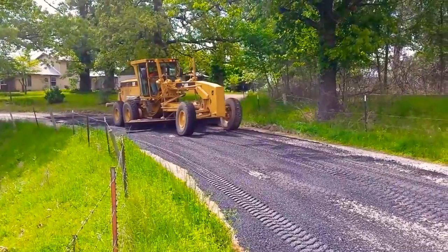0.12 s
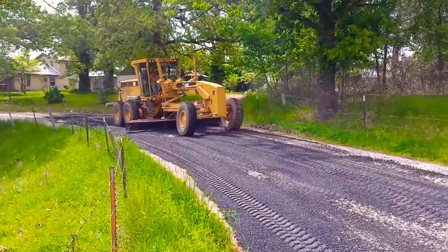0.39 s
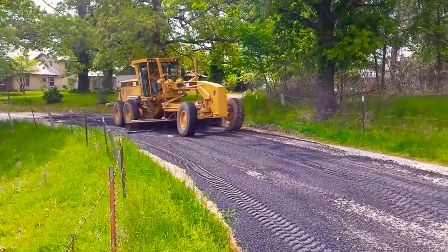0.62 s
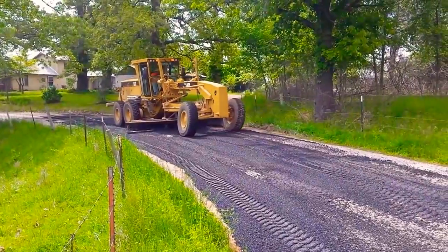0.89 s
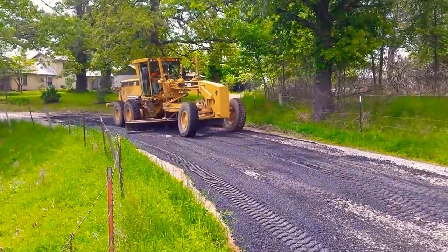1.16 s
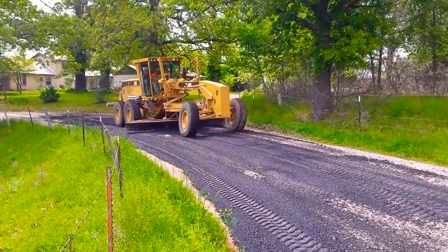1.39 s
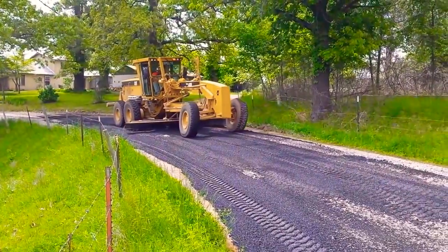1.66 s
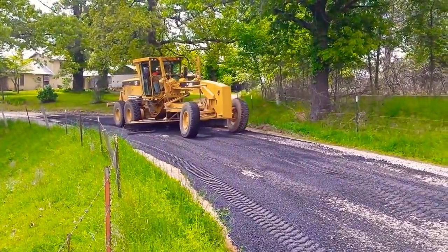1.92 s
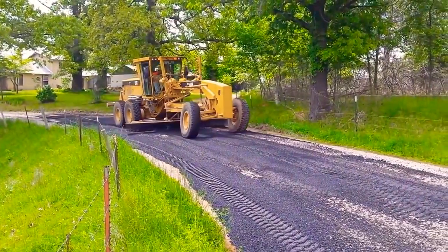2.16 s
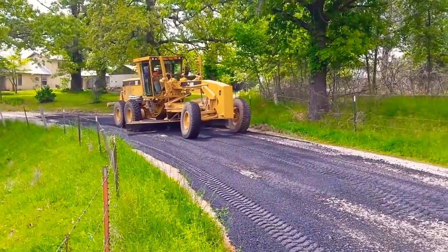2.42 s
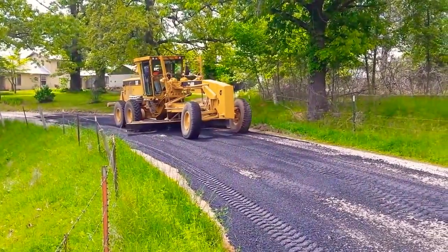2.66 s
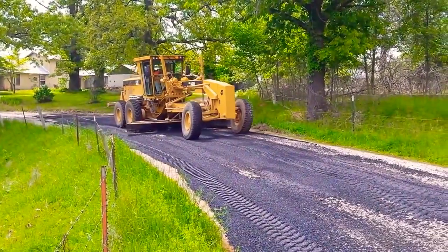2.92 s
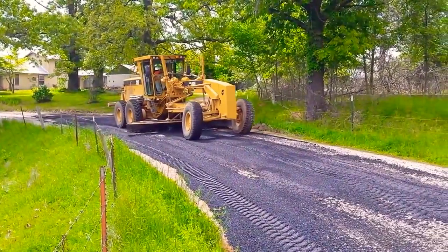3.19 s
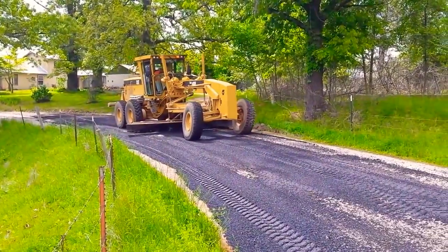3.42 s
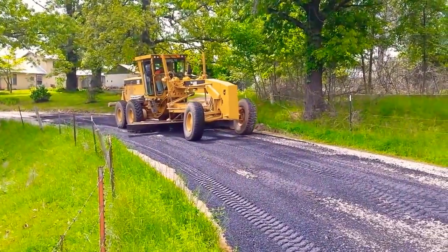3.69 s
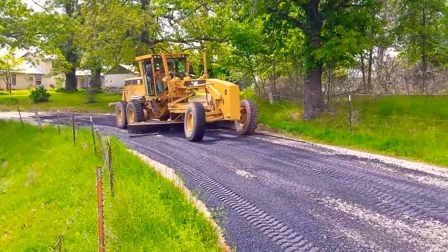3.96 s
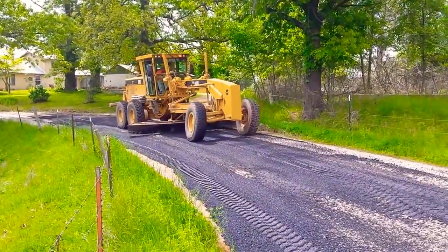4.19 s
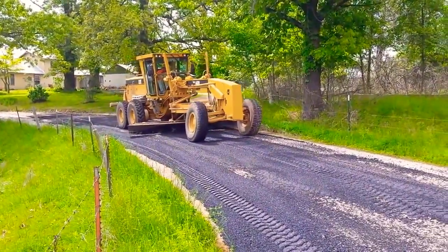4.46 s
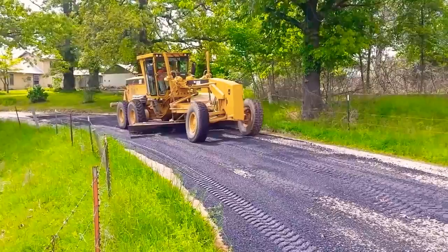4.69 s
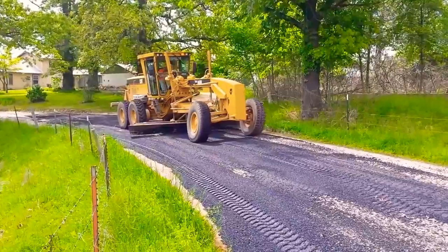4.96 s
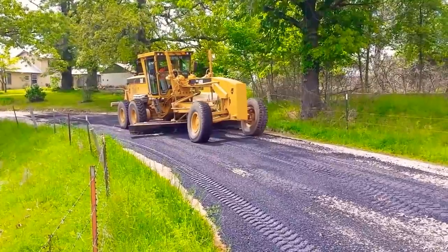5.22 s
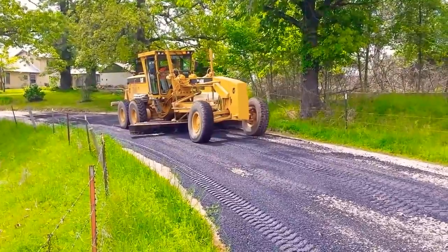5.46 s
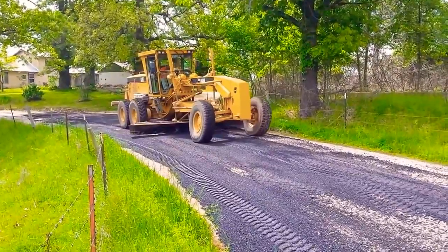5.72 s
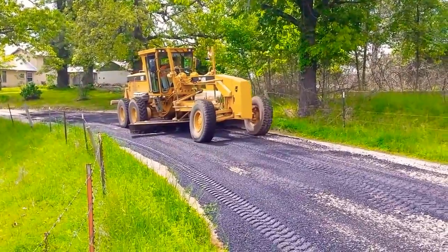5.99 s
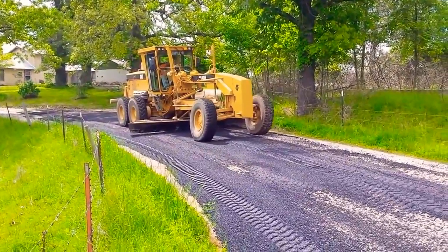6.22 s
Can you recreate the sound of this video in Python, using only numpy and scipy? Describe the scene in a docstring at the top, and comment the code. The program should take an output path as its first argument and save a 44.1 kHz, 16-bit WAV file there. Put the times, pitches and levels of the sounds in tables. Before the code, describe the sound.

Outdoors on a rural road, a heavy diesel grader runs at nearly constant speed, a low hum with rattling clatter, mechanical whine and airy hiss. Wind thumps the unprotected stereo microphone irregularly on each side, roughest from one and a half to three and a half seconds, with sharp slaps mostly on the right. A small bird gives quick falling whistles and then a fast trill before the engine is left clearer.

```python
"""Country road: a road grader at work, its six-cylinder diesel at a nearly steady speed.
Engine: exhaust and gear tones locked to the firings, noise pulsed by them, whines, hiss, grit, brief swells.
Gusts of shaped noise and sharp slaps buffet the two microphone ports, each on its own, and push the limiter.
A small bird sings falling sine sweeps, then a trill, with echoes from the trees; one thin tick near the end."""
import sys
import numpy as np
from scipy import signal
from scipy.fft import rfft, irfft, next_fast_len
from scipy.io import wavfile
from scipy.ndimage import uniform_filter1d, map_coordinates

SR = 44100
rng = np.random.default_rng(int(sys.argv[2]) if len(sys.argv) > 2 else 0)


def attenuation_scalar(level_db):
    """Turn a level in dB into a linear amplitude multiplier (20 dB per decade)."""
    decades = np.asarray(level_db, float) / 20
    return 10 ** decades


def output_pcm(signal):
    """Save a mono or channel-first signal as 16-bit PCM at the path in sys.argv[1].

    Samples are clipped to [-1, 1] before scaling.
    """
    pcm = np.clip(np.atleast_2d(signal).T, -1, 1) * 32767
    wavfile.write(sys.argv[1], SR, np.round(pcm).astype(np.int16))


N = 280416

FIRING_HZ = 86.47
# relative strength of the six firings of an engine cycle: level_db
CYLINDER_DB = [4.5, -16, 1.5, -20, 0.5, -11]


def in_time(rows):
    """Columns of a breakpoint curve, one value per sample."""
    s, *columns = np.transpose(rows)
    return [np.interp(np.arange(N) / SR, s, column) for column in columns]


def at_hz(points, hz):
    """A spectrum read on a log-frequency axis."""
    points_hz, values = np.transpose(points)
    return np.interp(np.log(hz), np.log(points_hz), values)


def rms_one(x):
    """Scales to rms 1."""
    return x / np.sqrt(np.mean(x ** 2) + 1e-20)


def filtered(x, response):
    """Applies a response given as a function of Hz."""
    size = next_fast_len(N)
    hz = np.maximum(np.arange(size // 2 + 1) * SR / size, 1)
    return irfft(rfft(x, size) * response(hz), size)[..., :N]


def coloured(x, spectrum):
    """Shapes a signal by a spectrum; rms 1."""
    return rms_one(filtered(x, lambda hz: attenuation_scalar(at_hz(spectrum, hz))))


def drift(rate_hz):
    """Slow random curve of rms 1."""
    return rms_one(filtered(rng.standard_normal(N), lambda hz: (hz > 1) / (1 + (hz / rate_hz) ** 2)))


def evened(x, span_s, share):
    """Takes a share of the slow chance swells out of a noise; rms 1."""
    span = round(span_s * SR)
    power = uniform_filter1d(uniform_filter1d(x ** 2, span), span)
    return rms_one(x / (power + 1e-9) ** (share / 2))


def resonances(modes):
    """Response of narrow resonances, each applied twice for steep skirts; level_db is for unit noise."""
    return lambda hz: np.sqrt(SR / np.pi) * sum(
        attenuation_scalar(db) / np.sqrt(width) / (1 + 1j * (hz - centre_hz) / width) ** 2 for centre_hz, width, db in modes)


def firing_phase(waver):
    """Firings counted since the start; the governor lets the speed waver a little."""
    return np.cumsum(FIRING_HZ * (1 + waver * drift(3.4))) / SR


def firing_gate(phase, depth, decay):
    """Each firing lifts the gain, which decays until the next; decay in firing intervals."""
    strength = attenuation_scalar(CYLINDER_DB)[phase.astype(int) % len(CYLINDER_DB)]
    return 1 + depth * strength * np.exp(-(phase % 1) / decay)


def exhaust(phase):
    """Low orders of the exhaust beat: sines locked to the firings, each level drifting."""
    # exhaust tones: multiple of the firing rate, level_db (rms before drift)
    orders = [(.5, -43), (2 / 3, -41), (0.98, -38.5), (4 / 3, -49.5), (3 / 2, -46.5), (5 / 3, -49.5),
              (2.0, -50.5)]
    tones = 0
    for order, db in orders:
        level = np.sqrt(2) * attenuation_scalar(db + 2.2 * drift(12.0))
        tones = tones + level * np.sin(2 * np.pi * order * phase)
    return tones


def gears(phase):
    """Gear and pump sines that follow engine speed; each level and phase drifts on its own."""
    # gear and pump tones: pitch_hz, level_db (rms before drift)
    gear_tones = [(405, -48.5), (556, -57), (610, -54), (714, -50), (838, -53.5), (920, -51), (1066, -55),
                  (2130, -56.5)]
    tones = 0
    for hz, db in gear_tones:
        level = np.sqrt(2) * attenuation_scalar(db + 3.87 * drift(7.4))
        turns = hz / FIRING_HZ * phase + .25 * drift(3.95)
        tones = tones + level * np.sin(2 * np.pi * turns)
    return tones


def repeating(phase, fresh):
    """Part of the clatter is the same contact pattern every cycle, which draws faint harmonics."""
    size, cycle_power_share = 3072, 0.36
    place = (phase / len(CYLINDER_DB) % 1 * size).astype(int)
    pattern = rng.standard_normal(size)[place]
    return np.sqrt(cycle_power_share) * pattern + np.sqrt(1 - cycle_power_share) * fresh


def ground(hz):
    """The road returns a late, phase-turned copy that cuts notches; rough ground scatters the treble."""
    lag_s, phase_rad, low_share, cut_hz = 0.001326, -0.86, 0.54, 2160
    share = low_share / (1 + (hz / cut_hz) ** 2)
    return 1 + share * np.exp(-1j * (2 * np.pi * hz * lag_s + phase_rad))


def knocks():
    """Valve and injector rattle: dense small clicks of uneven size and random sign."""
    # rattle spectrum: freq_hz, level_db (per Hz, relative)
    knock_spectrum = [(900, -27), (1400, 1.5), (1800, 1.5), (2400, -2.5), (3200, -1.5), (4000, -13),
                      (6000, -39.5)]
    knocks_per_s = 900
    sizes = attenuation_scalar(3.4 * np.minimum(rng.exponential(1, N), 4)) * rng.choice([-1, 1], N)
    return coloured(sizes * (rng.random(N) < knocks_per_s / SR), knock_spectrum)


def whines(white):
    """Noise through narrow resonances, swelling slowly together; a warped time axis wavers the pitch."""
    # whines of pump, gears and panels: freq_hz, width_hz, level_db (relative)
    whine_modes = [(630, 31, -18), (700, 26, -10), (860, 58, -17), (917, 20, -15), (1540, 46, -11),
                   (1824, 14, -26), (2134, 66, -15.5), (2222, 9.6, -17), (2363, 33, -17), (2728, 21, -17),
                   (3020, 30, -22.5), (3705, 41, -22.5)]
    pitch_waver = .007  # rms share
    steady = filtered(white * attenuation_scalar(1.5 * drift(1.9)), resonances(whine_modes))
    reading = np.cumsum(1 + pitch_waver * drift(4.0))
    return map_coordinates(steady, [reading], order=3, mode="reflect")


def grader_noise(phase, load):
    """One draw of clatter, whines, hiss and grit, all swelling with the load on the blade."""
    # levels of engine, hiss and grit, before trims and drifts: time_s, engine_db, hiss_db, grit_db
    grader_levels = [(0, -39, -48.5, -87), (.7, -40, -47.5, -73), (1.3, -38.5, -46, -77),
                     (1.76, -39.5, -47, -81), (2.3, -37, -44.5, -85), (2.5, -38.5, -47, -87),
                     (2.85, -38, -46, -83), (3.2, -40, -48, -91), (3.6, -40, -46, -74.5),
                     (4.1, -37.5, -46.5, -82), (4.7, -37.5, -45.5, -71), (5.2, -38, -47, -75.5),
                     (5.9, -37, -45, -71.5), (6.36, -37.5, -45, -69)]
    # combustion clatter through block and hood: freq_hz, level_db (per Hz, relative)
    clatter_spectrum = [(150, -5.5), (300, -1.5), (480, -1.5), (700, 1), (1000, -1.5), (1250, 0.5),
                        (1550, -5), (2000, -3), (2400, -12.5), (2800, -7.5), (3150, -8), (3350, -13),
                        (3600, -12), (4200, -21), (7000, -79)]
    # fan and intake hiss: freq_hz, level_db (per Hz, relative)
    hiss_spectrum = [(1500, -48), (2500, -5), (3500, -16.5), (4300, -1.5), (5200, 0.5), (6500, 2),
                     (7500, -0.5), (8500, -8.5), (9400, -18), (9750, -25), (10000, -45), (10800, -75)]
    # asphalt grit under the blade: freq_hz, level_db (per Hz, relative)
    grit_spectrum = [(8000, -54), (10500, 5), (12000, 11), (14000, 1), (15000, -30)]
    engine_db, hiss_db, grit_db = in_time(grader_levels)
    white = rng.standard_normal((4, N))
    pulsed = repeating(phase, white[0]) * firing_gate(phase, depth=0.34, decay=0.71)
    clatter = coloured(filtered(pulsed, ground), clatter_spectrum)
    clatter = clatter + attenuation_scalar(-10 + 1.1 * load) * knocks()
    tones = whines(white[1])
    hiss = coloured(white[2] * firing_gate(phase, depth=0.29, decay=0.28), hiss_spectrum)
    grit = coloured(white[3], grit_spectrum)
    engine_gain = attenuation_scalar(engine_db + 0.21 * load + 1.27 * drift(40))
    hiss_gain = attenuation_scalar(hiss_db + .5 * load + .5 * drift(23) + 5.0)
    grit_gain = attenuation_scalar(grit_db + 1.8 * load + 1.8 * drift(4.0))
    return engine_gain * (attenuation_scalar(4.5) * clatter + attenuation_scalar(4.0) * tones) + hiss_gain * hiss + grit_gain * grit


def grader():
    """Direct noise differs in phase and level between ports; scattered noise is drawn for each port."""
    # left-right likeness: freq_hz, shared share of power
    likeness = [(300, 0.94), (800, 0.96), (1200, 0.65), (1550, 0.93), (1950, 0.68), (2500, 0.8),
                (3100, 0.61), (3900, 0.45), (5000, 0.49), (7000, 0.35), (12000, 0.08)]
    # left over right: freq_hz, level_db
    left_over_right = [(300, 1.5), (500, -1), (800, 1), (1200, -2.5), (1800, -6), (2700, -0.5), (4000, 4.5),
                       (6200, 4), (8000, -4), (9400, -16), (11000, -34.5), (14000, -31.5)]
    # phase lead of the left port: freq_hz, lead_rad
    left_leads = [(300, 0.16), (1100, -0.6), (1550, -1.5), (2000, 1), (2500, 0.4), (3100, -2.1),
                  (3900, -1.42), (6600, -4), (8900, -4.1)]
    phase, load = firing_phase(waver=.005), drift(10)
    direct, *scattered = [grader_noise(phase, load) for path in ("direct", "left", "right")]

    def alike(hz):
        return np.clip(at_hz(likeness, hz), 0, 1)

    def port(side, own):
        def shade(hz):
            return attenuation_scalar(side * at_hz(left_over_right, hz) / 2)

        def direct_path(hz):
            return shade(hz) * np.sqrt(alike(hz)) * np.exp(.5j * side * at_hz(left_leads, hz))

        def scattered_path(hz):
            return shade(hz) * np.sqrt(1 - alike(hz))

        return filtered(direct, direct_path) + filtered(own, scattered_path)

    ports = [port(side, own) for side, own in zip((1, -1), scattered)]
    return np.array(ports) + exhaust(phase) + gears(phase)


def noise_swells():
    """Brief swells of narrow-band noise near 1.6, 1.8 and 2.8 kHz."""
    # swells: centre_s, length_s, level_db (before the bands)
    swell_events = [(3.022, 0.033, -32), (4.044, 0.04, -37), (4.46, 0.029, -31), (4.744, 0.052, -31),
                    (4.854, 0.048, -29.5), (4.935, 0.037, -32), (5.425, 0.043, -31), (5.812, 0.044, -38),
                    (5.91, 0.055, -37)]
    # bands: freq_hz, width_hz, level_db
    swell_bands = [(1567, 32, -4), (1820, 58, -13), (2780, 200, -17)]
    t = np.arange(N) / SR
    bells = sum(attenuation_scalar(db) * np.exp(-((t - s) / (length / 2)) ** 2) for s, length, db in swell_events)
    swells = filtered(rng.standard_normal(N) * bells, resonances(swell_bands))
    return swells * attenuation_scalar([[-2], [2]])


def puffs(port):
    """Single buffets: each a short bell of buffeting and flutter power at one port."""
    # buffets: centre_s, port (1 left, -1 right), length_s, buffet_db, flutter_db
    single_buffets = [(0.019, 1, 0.027, -16.5, -39), (0.095, -1, 0.011, -13, -23),
                      (0.17, -1, 0.027, -13, -23), (0.237, -1, 0.012, -17, -26),
                      (0.276, -1, 0.034, -19.5, -41), (0.312, -1, 0.011, -21, -32),
                      (0.397, -1, 0.013, -32, -27), (0.588, -1, 0.013, -31, -25),
                      (0.622, 1, 0.019, -9.5, -23.5), (0.683, -1, 0.052, -22, -21),
                      (0.73, -1, 0.01, -8, -27), (0.77, -1, 0.044, -20, -45),
                      (0.836, -1, 0.027, -25, -27.5), (0.932, -1, 0.056, -19.5, -42),
                      (0.758, 1, 0.06, -18, -39), (0.846, 1, 0.031, -14.5, -27),
                      (0.908, 1, 0.038, -14.5, -39), (1.043, 1, 0.032, -10, -38), (1.08, 1, 0.024, -9, -29),
                      (1.14, 1, 0.042, -17.5, -26.5), (1.117, -1, 0.064, -17, -35),
                      (1.167, -1, 0.013, -15, -24), (1.203, -1, 0.04, -22, -31),
                      (1.239, -1, 0.017, -12, -19.5), (1.444, -1, 0.062, -19, -29.5),
                      (1.474, 1, 0.06, -8.5, -38), (1.526, -1, 0.053, -14, -21.5),
                      (1.569, -1, 0.02, -17, -25), (1.58, 1, 0.056, -7.5, -29.5),
                      (1.622, -1, 0.049, -20, -17), (1.653, -1, 0.033, -16, -30),
                      (1.69, 1, 0.047, -11, -21.5), (1.737, 1, 0.015, -13, -16.5),
                      (1.767, -1, 0.04, -16, -30), (1.844, 1, 0.06, -8, -32), (1.885, -1, 0.034, -8.5, -21),
                      (1.929, -1, 0.02, -17, -24), (1.962, 1, 0.024, -16, -34),
                      (2.025, -1, 0.094, -12.5, -26), (2.077, -1, 0.061, -29, -25.5),
                      (2.15, -1, 0.064, -16.5, -30.5), (2.124, 1, 0.11, -19, -33),
                      (2.184, 1, 0.039, -10, -47), (2.336, -1, 0.087, -15.5, -24.5),
                      (2.352, 1, 0.017, -14, -37), (2.44, 1, 0.042, -19, -33), (2.462, -1, 0.031, -10, -17),
                      (2.498, -1, 0.039, -12, -13.5), (2.545, -1, 0.041, -30, -17),
                      (2.515, 1, 0.062, -12.5, -42), (2.585, -1, 0.054, -15, -18),
                      (2.632, -1, 0.03, -28, -17.5), (2.7, -1, 0.063, -16, -19), (2.727, 1, 0.1, -16, -36),
                      (2.784, -1, 0.013, -25, -15.5), (2.843, -1, 0.013, -28, -15),
                      (2.905, 1, 0.024, -11.5, -31), (2.937, 1, 0.023, -15, -25.5),
                      (2.973, -1, 0.021, -13, -18.5), (3.014, 1, 0.044, -16, -31),
                      (3.042, -1, 0.027, -21, -15.5), (3.093, -1, 0.073, -14, -15.5),
                      (3.08, 1, 0.04, -23, -31), (3.145, 1, 0.095, -15.5, -42),
                      (3.182, -1, 0.054, -13, -12), (3.237, -1, 0.014, -10, -10.5),
                      (3.28, 1, 0.018, -13, -39), (3.28, -1, 0.04, -27, -42), (3.344, -1, 0.027, -19, -17),
                      (3.373, -1, 0.027, -4, -20), (3.444, -1, 0.054, -10.5, -12),
                      (3.46, 1, 0.09, -18, -39), (3.499, -1, 0.028, -21, -26),
                      (3.621, -1, 0.026, -16.5, -21.5), (4.702, 1, 0.016, -22, -28),
                      (4.755, 1, 0.046, -15, -52), (4.831, 1, 0.022, -8.5, -32),
                      (4.926, 1, 0.026, -12, -33), (4.927, -1, 0.024, -14.5, -28),
                      (5.01, -1, 0.029, -14, -25), (5.056, -1, 0.025, -18, -29),
                      (6.17, 1, 0.062, -13.5, -33.5)]
    spread = 0.39  # bell width, share of length
    t, power = np.arange(N) / SR, np.zeros((2, N))
    for s, side, length, buffet_db, flutter_db in single_buffets:
        if side * port > 0:
            near = slice(max(round((s - 3 * length) * SR), 0), round((s + 3 * length) * SR))
            bell = np.exp(-((t[near] - s) / (spread * length)) ** 2)
            power[:, near] += attenuation_scalar([[2 * buffet_db], [2 * flutter_db]]) * bell
    return power


def wind(index, lump_db, lump_hz, snap_db, snap_hz):
    """Low buffeting noise and faster-snapping flutter follow a changing level; single buffets on top."""
    # slowly changing wind level at each port: time_s, left_db, right_db
    wind_levels = [(0.0, -33, -23.5), (0.3, -37, -31), (0.55, -32, -23), (0.7, -30, -25), (1.0, -23, -28.5),
                   (1.3, -21, -25), (1.5, -22.5, -21.5), (1.9, -21.5, -23), (2.38, -24.5, -26),
                   (2.46, -26, -18.5), (2.7, -28, -21), (3.0, -21.5, -19), (3.4, -29, -22.5),
                   (3.55, -29, -28.5), (4.4, -31.5, -35.5), (4.85, -23, -25), (5.15, -32, -28.5),
                   (6.36, -29.5, -35.5)]
    # buffeting spectrum: freq_hz, level_db (per Hz, relative)
    buffet_spectrum = [(20, -14), (33, -3), (60, -6), (90, 1), (130, -3.5), (170, -9), (230, -17.5),
                       (400, -40.5), (600, -67), (1500, -120)]
    # flutter spectrum before the port's cut: freq_hz, level_db (per Hz, relative)
    flutter_spectrum = [(90, -30), (150, 2.5), (220, 1.5), (300, 0.5), (400, -5.5), (550, -8.5), (800, -17),
                        (1200, -24.5), (2000, -51), (4000, -120)]
    # duller flutter at the more sheltered left port: cut_hz (left, right)
    flutter_cut_hz = [426, 1140]
    flutter_db, growth_db_per_db = [(-38.5, 1), (-25, 2.44)][index]  # at the reference wind level
    reference_db = -18.5
    wind_db = in_time(wind_levels)[index]
    lumpy_db = wind_db + lump_db * drift(lump_hz)
    edge_db = flutter_db + growth_db_per_db * (wind_db - reference_db) + 1.5 * drift(9)
    buffet_puffs, flutter_puffs = puffs((-1) ** index)
    snaps, air = drift(snap_hz), rng.standard_normal(N)
    buffet = coloured(air * attenuation_scalar(0.49 * snap_db * snaps), buffet_spectrum)
    buffet = evened(buffet, span_s=0.04, share=0.5)
    flutter = coloured(air * attenuation_scalar(snap_db * snaps), flutter_spectrum)
    flutter = evened(flutter, span_s=0.03, share=0.65)
    flutter = filtered(flutter, lambda hz: 1 / (1 + (hz / flutter_cut_hz[index]) ** 4))
    upper = filtered(flutter, lambda hz: hz > 250)  # flutter level is set by this part
    buffet_gain = np.sqrt(attenuation_scalar(2 * lumpy_db) + buffet_puffs)
    flutter_gain = np.sqrt(attenuation_scalar(2 * edge_db) + flutter_puffs)
    return buffet_gain * buffet + flutter_gain * flutter / np.std(upper)


def gusts():
    """Independent wind at each port, with the lowest bass cut."""
    port_cut_hz = 45
    ports = [wind(index, lump_db=2.5, lump_hz=16, snap_db=3.0, snap_hz=40.5) for index in range(2)]
    return filtered(np.array(ports), lambda hz: 1 / (1 + (port_cut_hz / hz) ** 4))


def slaps():
    """Sharp slaps of air on the ports: each click rings one damped swing of pressure, then a low-pass."""
    # slaps: start_s, level_db (before trim and filters), left_over_right_db
    slap_events = [(0.09, -23, -7.0), (0.174, -24, -10.0), (1.621, -15, -12.5), (2.488, -16, -21.5),
                   (2.569, -16, -16.5), (2.784, -22, -14.0), (2.843, -20, -9.0), (2.967, -20, -10.5),
                   (3.073, -16, -15.5), (3.104, -23, -10.5), (3.154, -19, -22.0), (3.193, -18, -16.5),
                   (3.237, -22, -17.0), (3.342, -21, -17.0), (3.365, -20, -13.0), (3.422, -16, -20.5),
                   (3.449, -17, -15.5), (5.007, -23, -11.5)]
    swing_hz, damping_hz, trim_db, cut_hz = 300, 420, 12, 1000
    clicks = np.zeros((2, N))
    for (s, db, pan_db), sign in zip(slap_events, rng.choice([-1, 1], len(slap_events))):
        clicks[:, round(s * SR)] = sign * attenuation_scalar(trim_db + db + np.minimum([pan_db, -pan_db], 0))
    r, w = np.exp(-np.pi * damping_hz / SR), 2 * np.pi * swing_hz / SR
    swing = signal.lfilter([0, 2 * np.sin(w)], [1, -2 * r * np.cos(w), r * r], clicks + 1e-18)
    return signal.sosfilt(signal.butter(2, cut_hz, fs=SR, output="sos"), swing)


def bird():
    """Falling sine whistles with a rough edge, and two echoes from the trees."""
    # falling notes: start_s, length_s, start_hz, end_hz, level_db
    falling_notes = [(2.613, .018, 8700, 7900, -44), (2.635, .02, 6600, 5400, -41),
                     (2.878, .030, 8600, 7500, -40), (2.905, .022, 6900, 5600, -38),
                     (2.948, .016, 5500, 5100, -42), (3.134, .015, 8700, 7900, -43),
                     (3.378, .022, 9000, 7200, -41), (3.396, .021, 7000, 6200, -40),
                     (3.432, .016, 5800, 5300, -39), (3.548, .018, 9200, 8800, -52)]
    # trill notes: start_s
    trill_s = [3.622, 3.687, 3.758, 3.844, 3.914, 3.987, 4.063, 4.134, 4.215, 4.290, 4.380]
    length_s, top_hz, bottom_hz, first_db, fade_db_per_s = .019, 8900, 4900, -34, 4
    trill = [(s, length_s, top_hz, bottom_hz, first_db - fade_db_per_s * (s - trill_s[0])) for s in trill_s]
    out, warble = np.zeros(N), drift(140)
    for s, length, start_hz, end_hz, db in falling_notes + trill:
        at = round(s * SR)
        along = np.arange(round(length * SR)) / (length * SR)
        pitch_hz = start_hz + (end_hz - start_hz) * along + 160 * warble[at:][:len(along)]
        # level dips as the pitch passes 6.9 kHz, deeper in quick notes
        dip_db = 22 if length < .02 else 4
        throat = attenuation_scalar(-dip_db * np.exp(-((pitch_hz - 6900) / 700) ** 2))
        whistle = np.sin(2 * np.pi * np.cumsum(pitch_hz) / SR)
        out[at:at + len(along)] += attenuation_scalar(db) * np.sin(np.pi * along) ** 1.06 * throat * whistle
    out = out * attenuation_scalar(2 * drift(200))  # rough edge
    echoes = attenuation_scalar(-7) * np.roll(out, round(.009 * SR)) + attenuation_scalar(-13) * np.roll(out, round(.027 * SR))
    return np.array([out + echoes, out - .3 * echoes]) * attenuation_scalar([[-3], [2]])


def tick():
    """A millisecond of bright noise, stronger at the right port."""
    centre_s, level_db, cut_hz = 5.5165, -26.5, 9500  # level before the filter
    burst = rng.standard_normal(N) * np.exp(-((np.arange(N) / SR - centre_s) / .0005) ** 2)
    bright = filtered(burst, lambda hz: 1 / (1 + (cut_hz / hz) ** 4))
    return attenuation_scalar(level_db) * bright * attenuation_scalar([[-12], [0]])


def scene():
    """Wind at the ports, the grader down the road, the bird beyond."""
    return gusts() + slaps() + grader() + noise_swells() + bird() + tick()


def band_limit(x):
    """A steep low-pass at the top of the band."""
    return signal.sosfilt(signal.butter(12, 14990, fs=SR, output="sos"), x)


def record(dry):
    """A linked limiter ducks both channels under peaks; what slips through is rounded off."""
    threshold_db, slope, release_db_per_s, attack_s = -8, 0.22, 85, 0.00039
    ceiling = .97
    peak_db = 20 * np.log10(np.abs(dry).max(axis=0) + 1e-9)
    over_db = np.maximum(peak_db - threshold_db, 0)
    ramp_db = release_db_per_s * np.arange(N) / SR
    held_db = np.maximum.accumulate(over_db + ramp_db) - ramp_db
    r = np.exp(-1 / (attack_s * SR))
    gain_db = -slope * signal.lfilter([(1 - r) ** 2], [1, -2 * r, r * r], held_db)
    held_down = dry * attenuation_scalar(gain_db) / ceiling
    rounded = ceiling * held_down / (1 + held_down ** 6) ** (1 / 6)
    return band_limit(rounded)


dry = scene()
out = record(dry)
output_pcm(out)
```